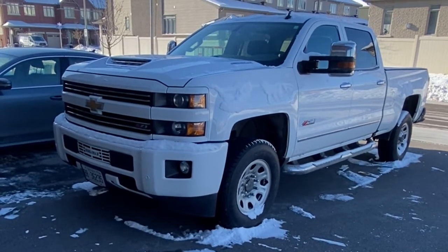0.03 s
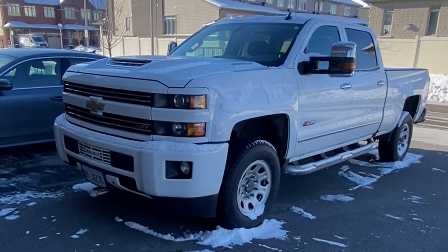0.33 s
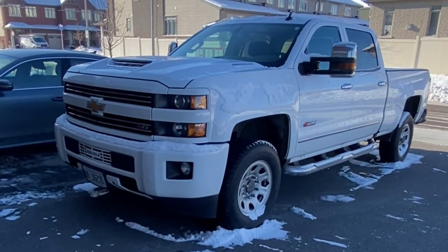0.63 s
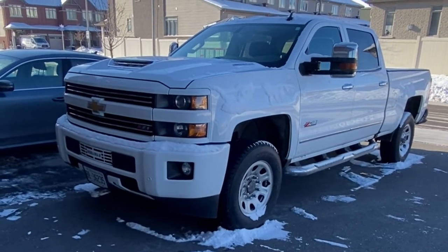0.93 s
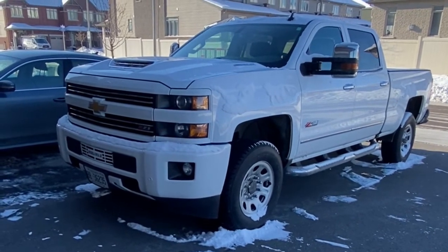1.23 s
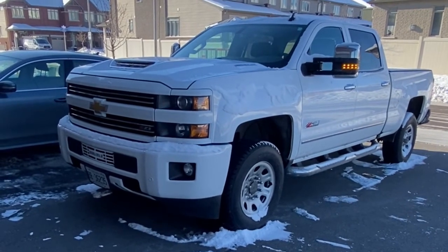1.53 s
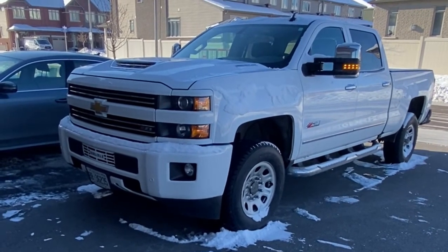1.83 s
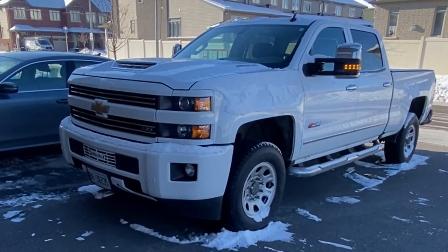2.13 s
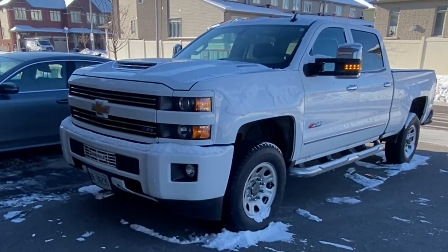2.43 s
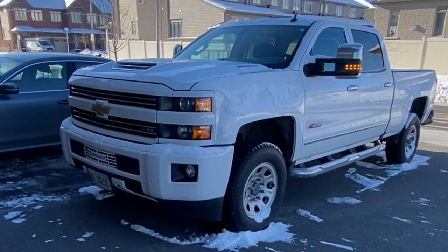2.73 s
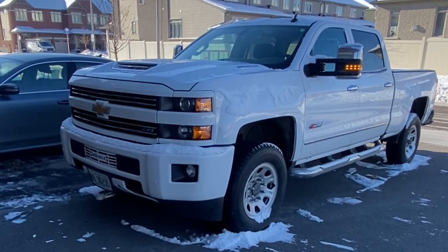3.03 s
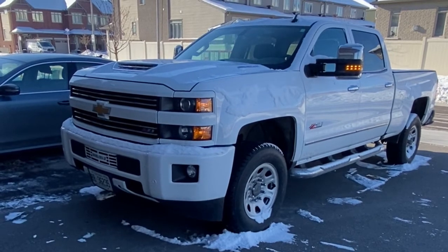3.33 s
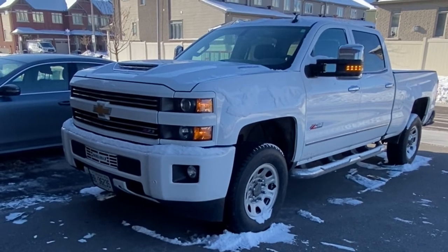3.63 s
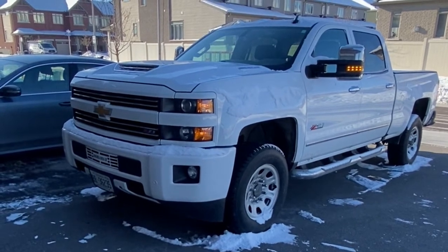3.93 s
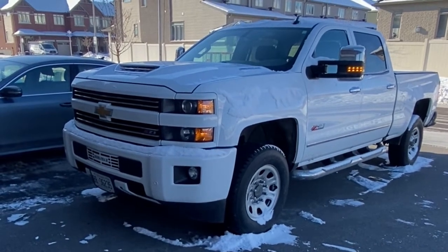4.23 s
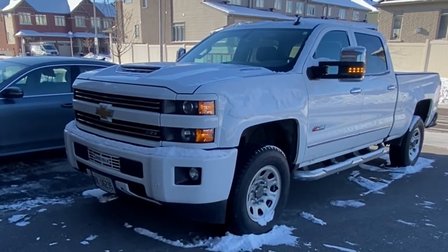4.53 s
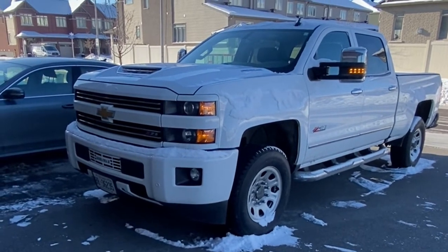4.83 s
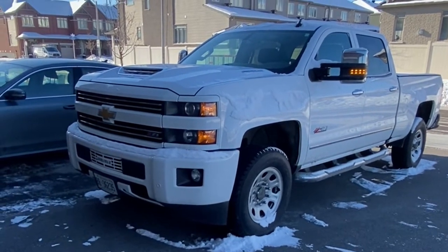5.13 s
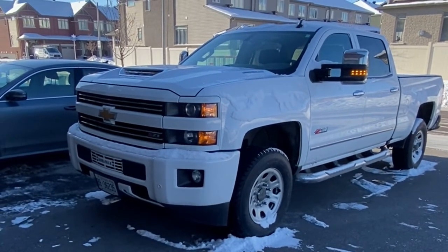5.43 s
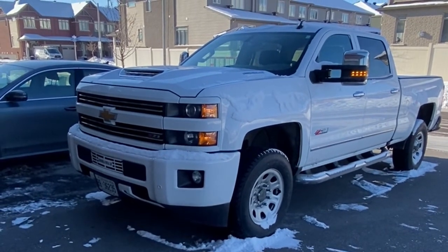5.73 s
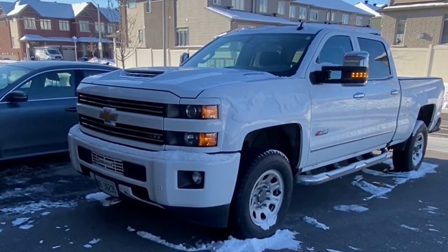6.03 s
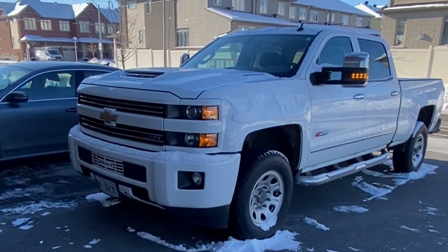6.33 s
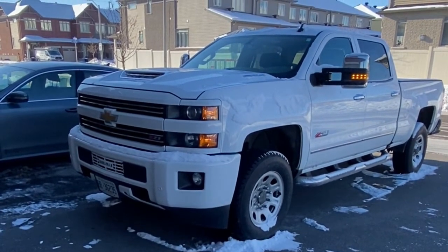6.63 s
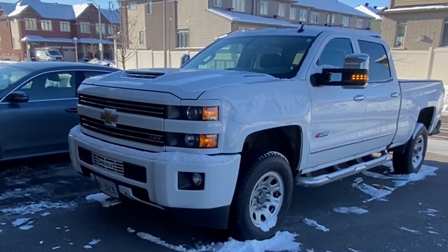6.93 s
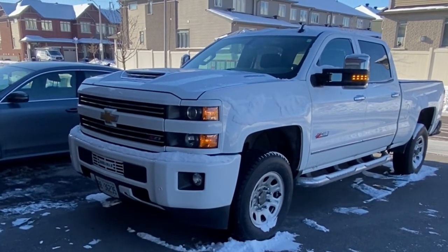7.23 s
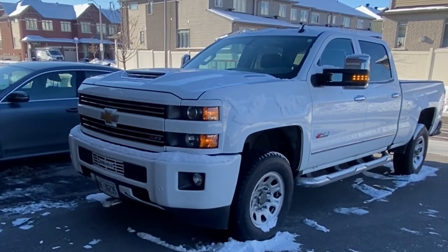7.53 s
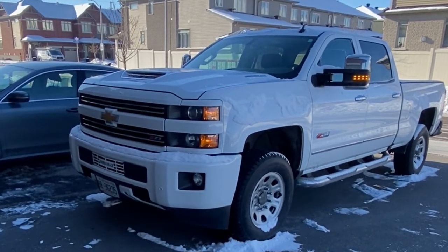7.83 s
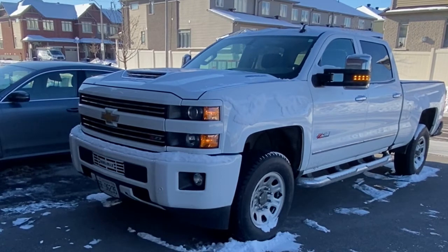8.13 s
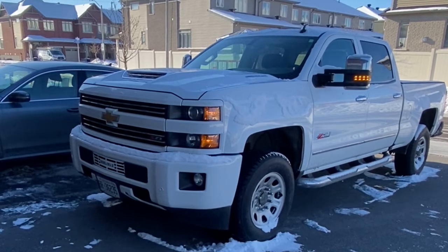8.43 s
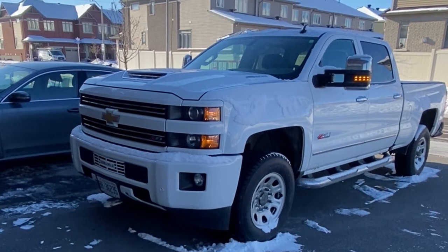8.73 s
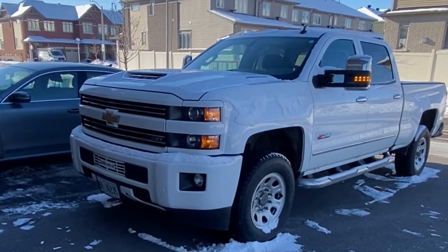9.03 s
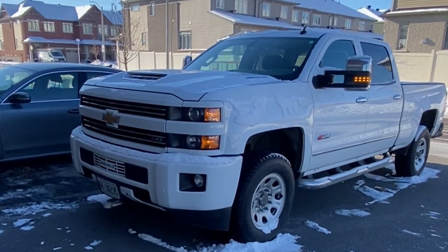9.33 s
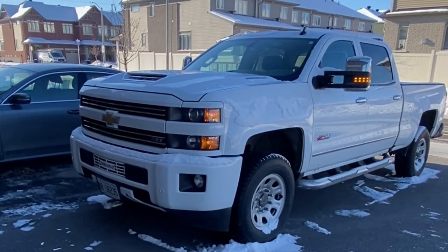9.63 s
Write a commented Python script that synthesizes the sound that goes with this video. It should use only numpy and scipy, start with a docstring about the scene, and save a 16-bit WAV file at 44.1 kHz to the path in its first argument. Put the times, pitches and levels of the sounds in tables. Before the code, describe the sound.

A cold diesel truck starts near the microphone outdoors: a short, pulsing starter whine, rough first firings, then a wavering run that steadies into a loud knocking idle with a droning exhaust. The fuel pump whistles thinly early on, loose metal ticks, and a small part snaps once. Later, soft wind bumps the microphone and the idle drops slightly. Faint far-off traffic lies underneath.

```python
"""A starter whines and sags at each compression: a cold diesel V8 pickup, close by on an open lot.
The engine catches, hunts twice and settles into a heavy idle, one cylinder knocking hardest.
Crank-locked blows ring the block and covers; exhaust pulses ring the pipe in a low drone.
The fuel pump whistles faintly, loose metal ticks, one part snaps. Distant traffic hums
throughout, and light gusts brush the microphone in the second half."""
import sys
import numpy as np
from scipy import signal
from scipy.fft import rfft, irfft, next_fast_len
from scipy.io import wavfile
from scipy.ndimage import map_coordinates

SR = 44100
rng = np.random.default_rng(int(sys.argv[2]) if len(sys.argv) > 2 else 0)


def wav_out(sig):
    """Save sig, one row per channel (or a flat mono array), as 16-bit PCM at SR to the path in sys.argv[1]."""
    wavfile.write(sys.argv[1], SR, np.round(np.clip(np.atleast_2d(sig).T, -1, 1) * 32767).astype(np.int16))


N = 436149
TIME_S, FREQ_HZ = np.arange(N) / SR, np.fft.rfftfreq(N, 1 / SR)
CRANK_START_S, CRANK_END_S = .25, 1.083
IDLE_HZ = 58.7  # firing rate, fast idle

# distant traffic: freq_hz, density_db
TRAFFIC_SPECTRUM = [(15, -34), (25, -22), (59, -8.5), (197, -24), (256, -19), (979, -28.5), (3470, -54.5),
                    (10300, -68), (12000, -69), (15600, -88), (22000, -120)]
# fuel pump and valve: start_s, end_s, first_hz, last_hz, level_db
PUMP_WHISTLES = [(0.157, 0.212, 5740, 5790, -66), (1.12, 1.508, 4440, 5200, -45),
                 (2.094, 4.702, 5050, 5100, -44)]
# compression peaks while cranking: time_s
COMPRESSIONS_S = [.273, .496, .67, .838, .997, 1.25]
# starter gear lines: mesh_multiple, level_db, roughness
GEAR_LINES = [(.42, -9, .6), (.9, -9, .55), (1, 0, .4), (1.9, -10, .4), (2, -5, .45), (2.8, -7, .45),
              (3, 2.5, .35), (4, -8, .45), (5, -2, .45), (7, -6, .6)]
# whine through the bell housing: freq_hz, gain_db
WHINE_FILTER = [(880, 1), (1050, -3), (1500, -3), (2250, -5), (2650, -1), (3150, 0), (3450, -6),
                (3900, -24), (5000, -19), (6000, -13), (7500, -20)]
# starter housing and flywheel resonances: centre_hz, width_hz, gain_db
HOUSING_MODES = [(2040, 90, 10), (2420, 160, 8), (2690, 90, 9), (3020, 110, 7), (5900, 450, 7.5),
                 (7450, 500, 4)]
# tooth grind and its treble rasp: freq_hz, density_db
GRIND_SPECTRUM = [(40, -34), (80, -21), (120, -18), (170, -3), (220, -14), (300, -5), (560, -16), (850, -3),
                  (1300, -9), (1800, -6.5), (3000, -12), (4200, -23.5), (5900, -18)]
RASP_SPECTRUM = [(8300, -26.5), (9500, -30), (15500, -35.5)]
# engine body and injector sizzle: freq_hz, density_db
ENGINE_SPECTRUM = [(140, -13.5), (200, -5), (260, 0), (320, -5.5), (450, -7.5), (900, -5.5), (1400, -0.5),
                   (2300, -8.5), (3080, -21.5), (3400, -27), (4400, -30), (5200, -22.5), (6100, -27)]
SIZZLE_SPECTRUM = [(7350, -42), (8100, -38), (9500, -41.5), (12000, -43.5), (15500, -44)]
# block, sump and panel resonances: centre_hz, width_hz, gain_db
PANEL_MODES = [(200, 31, -6), (335, 40, 3), (365, 30, 3), (420, 45, 6.5), (485, 90, 2), (568, 45, 5),
               (630, 45, 4), (680, 35, -6), (753, 45, 4.5), (915, 90, -7), (986, 45, 4), (1055, 55, -7),
               (1115, 55, 1.5), (1200, 130, -2), (1295, 60, 2.5), (1345, 50, -4), (1420, 90, 1),
               (1572, 75, 3), (1995, 70, -4), (2980, 420, 4.5), (3120, 120, 2.5), (3450, 110, 4),
               (5250, 300, 2.5)]
# pinion engaging, first firings, hardest knocks: start_s, level_db, t60_s, tilt_db_per_oct, sizzle_db
JOLTS = [(0.2473, -30, 0.16, 12, 8), (0.265, -27, 0.19, 11, 8), (1.089, -27.5, 0.52, -0.5, 0),
         (1.179, -26.5, 0.12, -2, 0), (1.276, -26, 0.21, 1, 0), (1.35, -27.5, 0.41, 0.5, 2),
         (1.505, -17.5, 0.48, 7, 5), (1.589, -25.5, 0.17, 11, 9), (1.78, -23, 0.28, 0.5, 0),
         (1.803, -17, 0.22, 2.5, -2), (1.845, -19.5, 0.28, 2.5, -2), (1.9, -21.5, 0.074, 1, 0),
         (1.992, -18, 0.2, 1, 0), (2.261, -22, .1, 0, 0), (2.52, -20.5, 0.58, -0.5, 0),
         (2.549, -13.5, 0.15, 6.5, -12), (2.605, -21, 0.15, 1.5, 0), (2.824, -22, .12, 7, -10),
         (3.243, -18.5, .2, 7, -4), (3.385, -20.5, .14, 7, -9), (3.666, -18.5, .11, 6.5, -10),
         (3.802, -17.5, .12, 6.5, -12), (8.006, -19.5, .13, 7, -12)]
# rocking on the mounts: start_s, level_db
LURCHES = [(.275, -28.5), (1.18, -37), (1.505, -26), (1.79, -31), (2.47, -20)]
# shaking body: freq_hz, density_db
RUMBLE_SPECTRUM = [(10, -55), (22, -32), (45, -5), (85, -6.5), (130, -7.5), (200, -23.5), (500, -97)]
# run-up, two governor swings, fast idle, step down: time_s, firing_hz
FIRING_RATE = [(1.05, 10), (1.25, 11), (1.38, 22), (1.55, 50), (1.85, 49), (2.0, 59), (2.17, 62.8),
               (2.33, 57), (2.52, 50), (2.66, 60.5), (2.77, 62.8), (2.95, 56.6), (3.15, 54.8), (3.45, 58.5),
               (3.85, 57.3), (4.2, 59.5), (5.05, 59.94), (5.7, 58.74), (8.9, 58.6), (9.45, 55), (9.7, 53)]
# combustion strength against idle: time_s, effort_db
EFFORT = [(1.1, -16), (1.33, -4.5), (1.44, 0.5), (1.52, 7), (1.6, -4), (1.75, -13.5), (1.83, 0.5),
          (1.95, -5), (2.08, -3.5), (2.4, -5.5), (3.7, -3), (4.3, -2), (8.9, 0.28), (9.89, 3)]
# blows in one eight-firing cycle, hard cylinder first: offset_firings, cold_db, warm_db
CYCLE_BLOWS = [(0, 5, 5), (.55, 1, -1), (.9, 2.5, 1.5), (1.7, -3, -3), (2.35, -1, -1.5), (3.25, -.5, 2),
               (4, -2.5, -3), (5.08, 1, -1.5), (5.98, 0, 4.5), (6.65, -2, -1.5), (7.1, .5, 1)]
# emphasis of the hard cylinder: time_s, boost_db
HARD_CYLINDER = [(1.5, -9), (2.72, -4), (2.8, 2), (3.25, 4.5), (3.85, 4.5), (4.2, 0.5), (9.8, -0.5)]
# exhaust harmonics: cycle_multiple, level_db
EXHAUST_LINES = [(6, -22), (8, 6), (9, -13), (11, 1.5), (12, -13), (13, -5), (14, -18), (16, -10),
                 (34, -13), (38, -12), (45, -14), (57, -11), (60, -13)]
# exhaust pipe resonances: centre_hz, width_hz, level_db
PIPE_MODES = [(174.8, 14, -6), (233.1, 23, 0), (305, 104, -14.5)]
# sump and rocker cover ringing: pitch_hz, level_db, t60_s
COVER_MODES = [(1293, 0, .14), (1425, -1.5, .12), (1580, -1, .1), (1690, -6, .07), (1890, -7, .05),
               (2100, -8, .04), (2330, -8, .045), (2915, -8.5, .08), (3065, -10.5, .08)]
# metal snap and its bounces: start_s, level_db
SNAP_HITS = [(4.0548, -10.5), (4.0562, -12), (4.0599, -21)]
# crack of the snap: freq_hz, density_db
CRACK_SPECTRUM = [(1200, -18), (3000, -9), (4400, -4), (5200, 0), (6100, -6), (6900, -14), (9500, -16),
                  (14000, -26)]
# ringing of the snap: pitch_hz, level_db, t60_s
SNAP_MODES = [(3300, -17, .02), (4750, -9, .012), (5380, -2, .012), (5470, -13, .05), (5850, -13, .025),
              (7720, -20, .045), (7950, -21, .04)]
# gusts on the microphone: peak_s, level_db, length_s, centre_hz
GUSTS = [(5.767, -24.5, 0.2, 72), (5.97, -25, .1, 65), (6.486, -18.5, 0.09, 64), (6.62, -22, 0.09, 62),
         (7.36, -23.5, 0.14, 62), (8.054, -26, 0.12, 60), (8.682, -16.5, 0.07, 56), (8.8, -19, 0.05, 90),
         (9.62, -30, 0.4, 70), (9.86, -24, 0.12, 70)]
# gust centred on 70 Hz: freq_hz, density_db
GUST_SPECTRUM = [(12, -50), (25, -24), (45, -18), (70, -3.5), (110, -5), (180, -22), (300, -27), (800, -84)]
# likeness of the two microphone ports: freq_hz, coherence
PORT_COHERENCE = [(40, .8), (100, .7), (250, .72), (600, .78), (1400, .86), (3000, .8), (8000, .74),
                  (12000, .93)]
# left port's phase lead: freq_hz, lead_rad
PORT_LEAD = [(25, .5), (60, .8), (250, .9), (780, .85), (1300, .3), (1900, .6), (3000, 2.1), (3600, 2.2),
             (5400, .8), (7400, 2.2), (9000, 1), (12000, .1)]
# left port over right: freq_hz, balance_db
PORT_BALANCE = [(380, -0.5), (700, 5), (1300, 4.5), (2400, -0.5), (8000, 0.5)]


def amp(db):
    """Decibels to gain."""
    return 10 ** (np.asarray(db) / 20)


def unit_rms(x):
    """Scale to rms 1."""
    return x / np.sqrt(np.mean(x ** 2) + 1e-20)


def spectrum(points, hz=FREQ_HZ):
    """Interpolate on a log-frequency axis."""
    knots_hz, values = np.transpose(points)
    return np.interp(np.log(hz + 1), np.log(knots_hz + 1), values)


def resonances_db(modes):
    """Peaks and dips over frequency."""
    return sum(db / (1 + (2 * (FREQ_HZ - hz) / width_hz) ** 2) ** 2 for hz, width_hz, db in modes)


def curve(points):
    """Interpolate (time_s, value) points."""
    return np.interp(TIME_S, *np.transpose(points))


def ramp(start_s, length_s):
    """Linear rise from 0 to 1."""
    return np.clip((TIME_S - start_s) / length_s, 0, 1)


def waver(rate_hz):
    """Smooth random drift, rms 1."""
    knots = rng.standard_normal(2000)
    return unit_rms(map_coordinates(knots, [TIME_S * rate_hz], order=3, mode="wrap"))


def noise(samples=N):
    """Two independent white noises."""
    return rng.standard_normal((2, samples))


def shaped(x, gain_db):
    """Filter by a gain curve, to rms 1."""
    return unit_rms(irfft(rfft(x) * amp(gain_db), x.shape[-1]))


def add_at(out, start_s, sound):
    """Mix a pair into out."""
    out[:, round(start_s * SR):][:, :sound.shape[-1]] += sound


def bay_echo(x, t60_s=.13, wet_db=-2):
    """Reflections off bonnet and ground smear a tone."""
    t = np.arange(SR // 5) / SR
    tail = noise(len(t)) * amp(-60 * t / t60_s)
    tail *= amp(wet_db) / np.linalg.norm(tail[0])
    tail[0, 0] += 1  # direct path
    return signal.fftconvolve(x[None], tail, axes=1)[:, :N] / np.sqrt(1 + amp(wet_db) ** 2)


def traffic(level_db=-48.5):
    """Steady hum of distant roads."""
    return amp(level_db) * shaped(noise(), spectrum(TRAFFIC_SPECTRUM))


def fuel_pump(flutter=.007):
    """Thin whistles glide up as fuel pressure builds."""
    out = np.zeros(N)
    for start_s, end_s, first_hz, last_hz, db in PUMP_WHISTLES:
        progress = ramp(start_s, end_s - start_s)
        hz = (first_hz + (last_hz - first_hz) * progress) * (1 + flutter * waver(120))
        out += amp(db) * np.sin(np.pi * progress) * np.sin(2 * np.pi * np.cumsum(hz) / SR)
    return bay_echo(out)


def compression(lag_s=0):
    """Starter load: 1 at each compression peak, 0 midway between."""
    stroke = np.interp(TIME_S - lag_s, COMPRESSIONS_S, np.arange(len(COMPRESSIONS_S)))
    return abs(np.cos(np.pi * stroke)) ** 2.6


def gear_whine(mesh_cycles, level_db=-24.5, dip_db=5.5, chatter_db=2, pinion_teeth=11):
    """Meshing teeth sing, loudest as the engine springs off a compression."""
    tone = np.zeros(N)
    for multiple, db, roughness in GEAR_LINES:
        line = amp(db + chatter_db * waver(44.36)) * np.cos(2 * np.pi * multiple * mesh_cycles)
        tone += line * (1 + roughness * waver(130))
    tone *= 1 + .35 * np.cos(2 * np.pi * mesh_cycles / pinion_teeth)  # off-centre pinion
    tone = shaped(tone, spectrum(WHINE_FILTER) + .5 * resonances_db(HOUSING_MODES))
    whine_db = level_db - dip_db * np.sqrt(compression(lag_s=.016))
    return bay_echo(tone * amp(whine_db) * ramp(CRANK_START_S, .043))


def gear_grind(mesh_cycles, cranked_s, level_db=-28.5, dip_db=4, clash_db=20.5, clash_s=.034):
    """Teeth scrape at the mesh rate, hardest as the pinion bites."""
    scrape = noise() * (1 + .35 * np.cos(2 * np.pi * mesh_cycles)) * amp(waver(300))
    scrape = shaped(scrape, spectrum(GRIND_SPECTRUM + RASP_SPECTRUM) + resonances_db(HOUSING_MODES))
    grind_db = level_db - dip_db * np.sqrt(compression(lag_s=.025))
    grind_db += clash_db * np.exp(-cranked_s / clash_s)
    return scrape * amp(grind_db) * ramp(CRANK_START_S - .02, .042) ** 3


def starter(free_hz=782, climb_hz_per_s=375, flutter=.009, coast_s=.17):
    """The motor gains speed, sags at each compression, then fades."""
    cranked_s = np.clip(TIME_S, CRANK_START_S, CRANK_END_S) - CRANK_START_S
    sag = (.223 + .17 * cranked_s) * compression()
    mesh_hz = (free_hz + climb_hz_per_s * cranked_s) * (1 - sag)
    mesh_cycles = np.cumsum(mesh_hz * (1 + flutter * waver(250))) / SR
    fade = 1 - ramp(COMPRESSIONS_S[-2], coast_s)
    return gear_whine(mesh_cycles) * fade ** 2 + gear_grind(mesh_cycles, cranked_s) * fade


def engine_colour_db():
    """Engine spectrum with its panel resonances."""
    return spectrum(ENGINE_SPECTRUM + SIZZLE_SPECTRUM) + resonances_db(PANEL_MODES)


def jolts(rise_s=.002):
    """Heavy blows rattle the whole engine."""
    out, t = np.zeros((2, N)), np.arange(SR // 2) / SR
    hz = np.fft.rfftfreq(len(t), 1 / SR)
    colour_db = np.interp(hz, FREQ_HZ, engine_colour_db())
    octaves = np.log2(np.clip(hz, 200, 3000) / 1000)
    treble = np.clip((hz - 3300) / 1200, 0, 1)
    for start_s, db, t60_s, tilt_db_per_oct, sizzle_db in JOLTS:
        rattle = shaped(noise(len(t)), colour_db + tilt_db_per_oct * octaves + sizzle_db * treble)
        add_at(out, start_s, rattle * amp(db - 60 * t / t60_s) * (1 - np.exp(-t / rise_s)))
    return out


def lurches(t60_s=.72):
    """Low thumps of the engine rocking on its mounts."""
    rocking = sum(amp(db - 60 * np.maximum(TIME_S - start_s, 0) / t60_s) * ramp(start_s, .029)
                  for start_s, db in LURCHES)
    return shaped(noise(), spectrum(RUMBLE_SPECTRUM)) * rocking


def blow_timing(firings, warm_from_s=6.5, warm_over_s=1):
    """Yield samples and strengths per cycle blow; the knock shifts between cylinders as they warm."""
    hard_db, warmth = curve(HARD_CYLINDER), ramp(warm_from_s, warm_over_s)
    for k, (offset, cold_db, warm_db) in enumerate(CYCLE_BLOWS):
        at = np.flatnonzero(np.diff(np.floor((firings - offset) / 8)) > 0)
        yield at, cold_db + (warm_db - cold_db) * warmth[at] + (k == 0) * hard_db[at]


def blows(firings, t60_s, rattle_share, spread_db, contrast, floor, jitter_s=.00013, rise_s=.0014):
    """Each blow rings its own path through the block and rattles loose parts."""
    t = np.arange(SR // 6) / SR
    decay = amp(-60 * t / t60_s) * (1 - np.exp(-t / rise_s))
    decay /= np.linalg.norm(decay)
    ringing, power = np.zeros((2, N + SR)), np.zeros(N + SR)
    for at, db in blow_timing(firings):
        lateness, strength = rng.standard_normal((100, 2))[:len(at)].T
        starts = np.abs(at + lateness * jitter_s * SR).astype(int)
        gains = amp(contrast * db + spread_db * np.minimum(strength, 1.5))
        path = noise(len(t)) * decay
        for i, gain in zip(starts, gains):
            ringing[:, i:i + len(t)] += gain * path
            power[i:i + len(t)] += (gain * decay) ** 2
    rattle = unit_rms(noise() * np.sqrt(power[:N] / power[:N].mean() + floor ** 2))
    return np.sqrt(1 - rattle_share) * unit_rms(ringing[:, :N]) + np.sqrt(rattle_share) * rattle


def clatter(firings, effort_db, thud_db=-28, knock_db=-26.5, tick_db=-36, rumble_db=-8.5):
    """Block thuds, combustion knocks and injector ticks: crank-locked, growing with effort."""
    above_low, above_mid, above_high = (1 / (1 + (hz / (FREQ_HZ + 1)) ** 8) for hz in (130, 900, 4000))
    bands = above_low - above_mid, above_mid - above_high, above_high
    colour_db = engine_colour_db()
    low_db, mid_db, high_db = (colour_db + 10 * np.log10(abs(band) + 1e-12) for band in bands)
    grit = amp(1.2 * waver(350))  # each knock is a cluster of tiny impacts
    thud = blows(firings, t60_s=.12, rattle_share=.41, spread_db=2, contrast=.33, floor=1)
    knock = blows(firings, t60_s=.11, rattle_share=.3, spread_db=2.1, contrast=.72, floor=.5)
    tick = blows(firings, t60_s=.1, rattle_share=.8, spread_db=3, contrast=.3, floor=2.3)
    rumble = amp(rumble_db) * shaped(noise(), spectrum(RUMBLE_SPECTRUM))
    out = (shaped(thud, low_db) + rumble) * amp(thud_db + .69 * effort_db)
    out += shaped(grit * knock, mid_db) * amp(knock_db + .99 * effort_db)
    out += shaped(grit * tick, high_db) * amp(tick_db + .34 * effort_db)
    return out * ramp(.97, .038)


def pinion_release(start_s=1.089, level_db=-29, t60_s=.37):
    """The pinion drops out and leaves the flywheel ringing."""
    ring = shaped(noise(), resonances_db([(2900, 980, 29.5), (5970, 880, 18), (7680, 3500, 12)]))
    return ring * amp(level_db - 60 * np.maximum(TIME_S - start_s, 0) / t60_s) * ramp(start_s, .0027)


def firing_note(firings, wander=.06):
    """Harmonics of the engine cycle, wandering as the burns vary."""
    out = np.zeros(N)
    for multiple, db in EXHAUST_LINES:
        phase = 2 * np.pi * (multiple * firings / 8 + rng.random())
        in_phase = np.cos(phase) * (1 + wander * waver(5))
        quadrature = np.sin(phase) * wander * waver(6.3)
        out += amp(db) * (in_phase + quadrature)
    return unit_rms(out)


def pipe_drone(firings, lope_s=.00065, spread=.07):
    """Exhaust pulses ring the pipe; the crank speed swings within each cycle, delaying them by turns into a
    lope."""
    at = np.flatnonzero(np.diff(np.floor(firings)) > 0)
    delay_s = lope_s * (1 + np.cos(2 * np.pi * np.floor(firings[at + 1]) / 8))
    pulses = np.zeros(N + SR)
    pulses[at + (delay_s * SR).astype(int)] = 1 + spread * rng.standard_normal(len(at))
    pipe = sum(amp(db) / (1 + 1j * (FREQ_HZ - hz) / width_hz) ** 2 for hz, width_hz, db in PIPE_MODES)
    return unit_rms(irfft(rfft(pulses[:N]) * pipe, N))


def exhaust(firings, firing_hz, effort_db, even_from_s=2.03, catching_db=-38.5, ease_db_per_s=.22):
    """Note and drone swell with speed; the drone sets in once firing is even and eases with warmth."""
    over_idle_hz = firing_hz - IDLE_HZ
    note_db = -24 + .54 * over_idle_hz + .27 * effort_db
    running_db = -31 + 1.4 * over_idle_hz - ease_db_per_s * (TIME_S - even_from_s)
    drone_db = catching_db + (running_db - catching_db) * ramp(even_from_s, .023)
    return (firing_note(firings) * amp(note_db) + pipe_drone(firings) * amp(drone_db)) * ramp(1.19, .15)


def covers(firings, effort_db, level_db=-32, spread_db=4.5):
    """Each blow rings the metal covers with a new mix of modes."""
    at, blow_db = map(np.concatenate, zip(*blow_timing(firings)))
    out = np.zeros((2, N))
    for hz, db, t60_s in COVER_MODES:
        strength, phase = rng.standard_normal((1000, 2, 2))[:len(at)].T
        kick_db = .4 * blow_db + spread_db * np.minimum(strength, 1.5)
        kicks = np.zeros((2, N), complex)
        kicks[:, at] = amp(kick_db) * np.exp(2j * np.pi * phase)
        pole = np.exp((2j * np.pi * hz - np.log(1000) / t60_s) / SR)
        out += amp(db) * unit_rms(signal.lfilter([1], [1, -pole], kicks + 1e-18).real)
    return unit_rms(out) * amp(level_db + effort_db) * ramp(1.2, .3)


def clinks(firing_hz, effort_db, rate_hz=60, pitch_hz=2750, t60_s=.04, level_db=-42, modes=5):
    """Loose metal ticks at random, harder as speed drops below the fast idle."""
    out, t = np.zeros((2, N + SR)), np.arange(SR // 16) / SR
    attack = 1 - np.exp(-t / .0002)
    for strength, *detune in rng.standard_normal((round(rate_hz * N / SR), 1 + modes)):
        hz = pitch_hz * (1 + .11 * np.array(detune))[:, None]
        ring = np.sin(2 * np.pi * (hz * t + rng.random((2, modes, 1)))).sum(1)
        add_at(out, rng.integers(N) / SR, ring * amp(2 * min(strength, 2) - 60 * t / t60_s) * attack)
    shake_db = np.clip(IDLE_HZ - firing_hz, 0, 4)  # 1 dB per Hz
    return unit_rms(out[:, :N]) * amp(level_db + effort_db + shake_db) * ramp(1.2, .3)


def snap(decay_s=.0011, echo_db=-15, echo_t60_s=.05):
    """A small metal part cracks against its seat, bounces and rings."""
    out, t = np.zeros((2, N)), np.arange(SR // 10) / SR
    crack_db = spectrum(CRACK_SPECTRUM, np.fft.rfftfreq(len(t), 1 / SR))
    envelope = (1 - np.exp(-t / .0002)) * (np.exp(-t / decay_s) + amp(echo_db - 60 * t / echo_t60_s))
    for start_s, hit_db in SNAP_HITS:
        crack = shaped(noise(len(t)), crack_db) * envelope
        ring = sum(amp(db - 60 * t / t60_s) * np.sin(2 * np.pi * (hz * t + rng.random((2, 1))))
                   for hz, db, t60_s in SNAP_MODES)
        add_at(out, start_s, amp(hit_db) * (crack + ring))
    return out


def wind(gain_db=2):
    """Gusts buffet each port separately, each centred on its own pitch."""
    out, t = np.zeros((2, N + SR)), np.arange(SR) / SR - .5
    hz = np.arange(SR // 2 + 1)
    for peak_s, db, length_s, centre_hz in GUSTS:
        gust = shaped(noise(SR), spectrum(GUST_SPECTRUM, hz * 70 / centre_hz))
        add_at(out, peak_s - .5, gust * amp(db + gain_db) * np.exp(-(2 * t / length_s) ** 2))
    return out[:, :N]


def thin_boom(engine, band_hz=(110, 290), gain_db=-4.5, start_s=8.8, over_s=.3):
    """The engine's 110-290 Hz band dips from 8.8 s on, just after the strongest gusts."""
    boom = signal.sosfiltfilt(signal.butter(2, band_hz, "bandpass", fs=SR, output="sos"), engine)
    return engine - boom * (1 - amp(gain_db * ramp(start_s, over_s)))


def mic_ports(pair):
    """(direct, scattered) to (left, right): the left port leads, scatter differs between ports."""
    size = next_fast_len(N + SR // 2)
    hz = np.fft.rfftfreq(size, 1 / SR)
    coherence, lead_rad = spectrum(PORT_COHERENCE, hz), spectrum(PORT_LEAD, hz)
    direct, scattered = rfft(pair, size)
    direct *= np.sqrt(1 + coherence)
    scattered *= np.sqrt(1 - coherence)
    skew = np.exp(.5j * lead_rad) * amp(spectrum(PORT_BALANCE, hz) / 2)
    stereo = np.array([(direct + scattered) * skew, (direct - scattered) / skew])
    return irfft(stereo / np.sqrt(1 + coherence * np.cos(lead_rad)), size)[:, :N]


def scene(hard_knock_s=4.074):
    """Crank angle, counted in firings, times blows and exhaust; layers mix as (direct, scattered)."""
    firing_hz, effort_db = curve(FIRING_RATE), curve(EFFORT)
    firings = np.cumsum(firing_hz) / SR
    firings -= np.interp(hard_knock_s, TIME_S, firings)  # the hard cylinder fires at zero
    engine = clatter(firings, effort_db) + covers(firings, effort_db)
    engine += clinks(firing_hz, effort_db) + jolts()
    engine[0] += exhaust(firings, firing_hz, effort_db)  # direct only
    truck = starter() + lurches() + pinion_release() + fuel_pump() + thin_boom(engine) + snap()
    return mic_ports(truck + traffic()) + wind()


def record(dry, cutoff_hz=15900):
    """Steep low-pass band limit."""
    lowpass = signal.firwin(511, cutoff_hz, window=("kaiser", 9), fs=SR)
    return signal.oaconvolve(dry, lowpass[None], "same")


dry = scene()
out = record(dry)
wav_out(out)
```